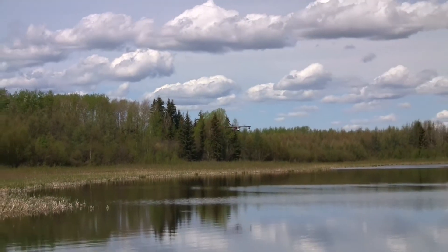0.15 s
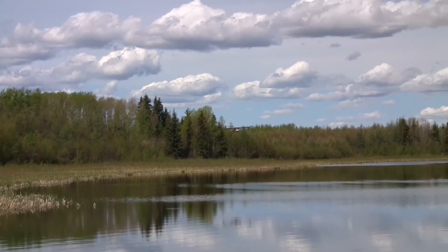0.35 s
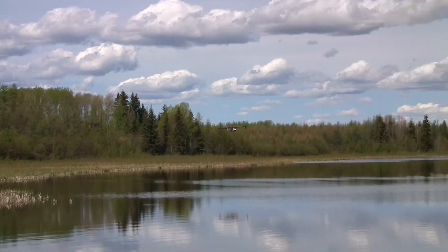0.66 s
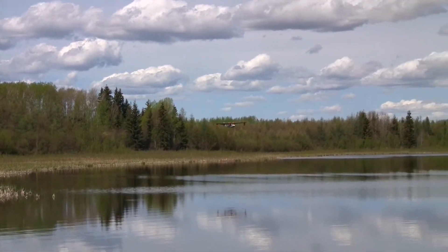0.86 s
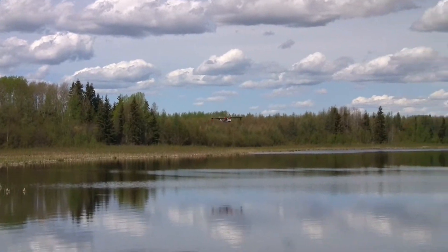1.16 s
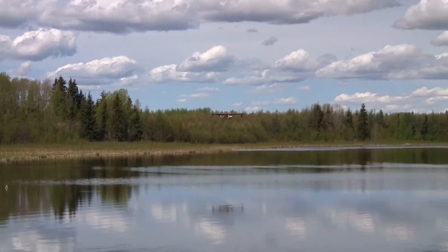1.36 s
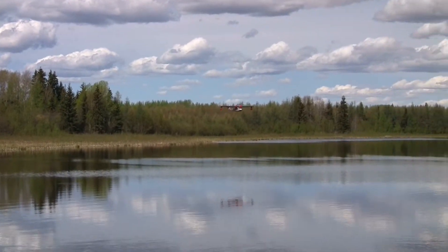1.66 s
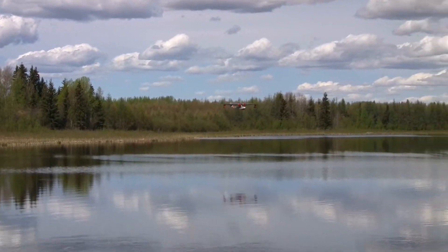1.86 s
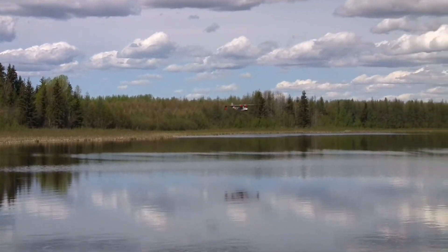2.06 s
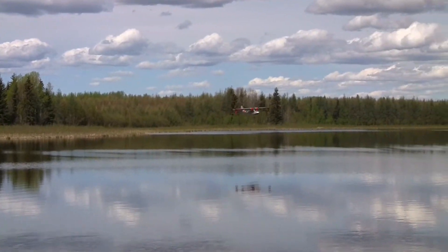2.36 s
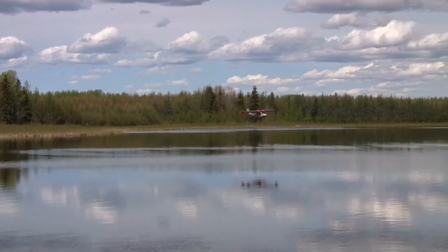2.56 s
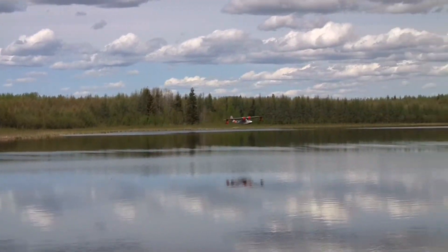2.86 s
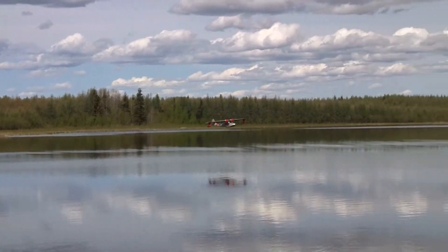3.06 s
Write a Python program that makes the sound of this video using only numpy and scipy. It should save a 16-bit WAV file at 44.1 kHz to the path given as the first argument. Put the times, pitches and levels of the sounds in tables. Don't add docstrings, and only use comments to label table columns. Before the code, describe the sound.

Twin-engined model floatplane drones and crackles as it flies low over a calm lake, nearing

```python
import sys
import numpy as np
from scipy import signal
from scipy.fft import rfft, irfft, next_fast_len
from scipy.io import wavfile
from scipy.ndimage import uniform_filter1d, map_coordinates

SR = 44100
rng = np.random.default_rng(int(sys.argv[2]) if len(sys.argv) > 2 else 0)


def ratio_of_db(decibels):
    return 10 ** (np.asarray(decibels, float) / 20)


def wav_record(signal):
    frames = np.transpose(np.atleast_2d(signal))
    bounded = np.clip(frames, -1, 1)
    quanta = np.round(bounded * 32767).astype(np.int16)
    wavfile.write(sys.argv[1], SR, quanta)


N = 141561
PUFF_TURNS = 0.15


def level(x, db):
    return x * ratio_of_db(db) / np.sqrt(np.mean(x ** 2))


def colour(x, points, sections=()):
    size = next_fast_len(N + SR)
    hz = np.arange(size // 2 + 1) * SR / size
    point_hz, point_db = np.array(points, float).T
    curve_db = np.interp(np.log(hz + 1), np.log(point_hz), point_db)
    cepstrum = irfft(curve_db * np.log(10) / 20, size)
    cepstrum[1:size // 2] *= 2
    cepstrum[size // 2 + 1:] = 0
    gain = np.exp(rfft(cepstrum))
    for zero_hz, zero_width_hz, pole_hz, pole_width_hz in sections:
        zero = zero_hz ** 2 - hz ** 2 + 1j * hz * zero_width_hz
        pole = pole_hz ** 2 - hz ** 2 + 1j * hz * pole_width_hz
        gain = gain * zero / pole
    return irfft(rfft(x, size) * gain, size)[..., :N]


def walk(rate_hz):
    hold = int(SR / rate_hz)
    steps = np.repeat(rng.standard_normal(N // hold + 1), hold)
    return 1.3 * uniform_filter1d(uniform_filter1d(steps, hold), hold)[:N]


def clicks(at, size):
    taps = np.floor(at)[:, None] + np.arange(-7, 9)
    off = taps - at[:, None]
    pulse = size[:, None] * np.sinc(off) * np.cos(off * np.pi / 16) ** 2
    out = np.zeros(N + 32)
    np.add.at(out, np.clip(taps, 0, N).astype(int), pulse)
    return out[:N]


# frequency in Hz, level in dB.
AIR_CURVE = [(25, -28), (50, -22.5), (100, -12), (250, -11), (1500, -14.5), (4000, -16.5), (8000, -40),
             (12500, -44.5)]


def air():
    mid, side = colour(rng.standard_normal((2, N)), AIR_CURVE) * ratio_of_db(walk(0.82))
    side = colour(side, [(30, -1), (300, 0), (3000, 0)])
    return level(np.array([mid + side, mid - side]), -49)


# time in seconds, speed in turns per second.
FAST_ENGINE_SPEED = [(0, 92.3), (.2, 92.6), (.42, 95.6), (.7, 93.7), (.9, 90.7), (1.15, 91), (1.3, 89.2),
                     (1.6, 88.8), (1.8, 87.3), (2.1, 88), (2.35, 86), (2.6, 87), (2.92, 84.4), (3.21, 85.7)]
SLOW_ENGINE_SPEED = [(0, 92), (.2, 92), (.45, 89.3), (.8, 88), (1.1, 87), (1.37, 83.3), (1.52, 85),
                     (1.85, 80), (2.2, 83.2), (2.42, 81.3), (2.63, 83.2), (2.8, 81.8), (3.21, 79.5)]


def engine(speed, gain):
    sway_hz, sway_db, drift_rad = 12, 2.2, 0.45
    turn_jitter, crack_idle_db, crack_scatter_db = 0.005, -5.5, 1.3
    t = np.arange(N) / SR
    phase = np.cumsum(np.interp(t, *np.array(speed).T)) / SR

    hum = 0
    for order in range(1, 29):
        loose = 0.35 if order == 10 else 1
        order_db = -3 * (order % 2) + 5 * (order == 10) - 2.5 * (order == 12)
        sway = ratio_of_db(order_db + loose * sway_db * walk(sway_hz))
        drift = 2 * np.pi * rng.random() + loose * drift_rad * walk(sway_hz)
        hum = hum + sway * np.cos(np.pi * order * phase + drift)

    timing, strength = rng.standard_normal((2, 400))
    turn = np.arange(1, int(phase[-1]))
    when = turn + turn_jitter * timing[turn]
    size = ratio_of_db(crack_idle_db * (turn % 2) + crack_scatter_db * strength[turn])
    crack = clicks(np.interp(when, phase, np.arange(N)), size)
    latest = np.clip(np.searchsorted(when, phase) - 1, 0, len(turn) - 1)
    puff = size[latest] * np.exp(-np.abs(phase - when[latest]) / PUFF_TURNS)
    gas = puff * rng.standard_normal(N)
    return np.array([gain * hum, crack, gas])


# frequency in Hz, level in dB.
WASH_CURVE = [(70, -54.5), (150, -8), (350, -3), (700, -10), (2000, -14), (4000, -22), (8500, -33.5),
              (12500, -56)]
# zero in Hz, zero width in Hz, pole in Hz, pole width in Hz.
SILENCER_SECTIONS = [(580.7, 27, 494.6, 116), (1560, 132, 1599, 393), (3018, 510, 3182, 323),
                     (1000, 388, 1089, 363), (2517, 850, 2470, 460)]


def propeller_wash():
    wash = ratio_of_db(1.52 * walk(9.07)) * rng.standard_normal(N)
    return level(colour(wash, WASH_CURVE, SILENCER_SECTIONS[1:]), -10)


# frequency in Hz, level in dB.
THUMP_CURVE = [(50, -64), (90, -31.5), (260, -6.5), (450, -4.5), (520, -2.5), (590, 1.5), (800, -3.5),
               (1200, -23.5)]
CRACK_CURVE = [(400, -41), (700, 18.5), (1300, 1), (2100, 3), (3300, -7), (5000, -19), (8000, -31.5),
               (11000, -62.5)]
GAS_CURVE = [(500, -24), (1300, -1), (2100, -0.5), (3300, -8), (5000, -14), (8500, -19.5), (10500, -24.5),
             (12500, -55.5)]


def plane(bright, share_db, hum_db, ring_db, db):
    crack_db, gas_db, hard_puff_db, hard_space_s = -11, -18, -7, 0.011
    cowling_hz, cowling_width_hz, clear_hz = 2635, 38, 3780
    fast = engine(FAST_ENGINE_SPEED, ratio_of_db(-share_db / 2))
    slow = engine(SLOW_ENGINE_SPEED, ratio_of_db(share_db / 2))
    thump, crack, gas = fast + slow

    hard = hard_firings(db)
    near_hard = uniform_filter1d(1.0 * (hard != 0), int(hard_space_s * SR)) > 0
    puff_decay = np.exp(-90 / PUFF_TURNS / SR)
    puff = signal.lfilter([1], [1, -puff_decay], hard) * rng.standard_normal(N)
    crack = crack * ~near_hard + hard + backfires()
    gas = gas + ratio_of_db(hard_puff_db) * puff

    high = level(colour(crack, CRACK_CURVE, SILENCER_SECTIONS), crack_db)
    high = high + level(colour(gas, GAS_CURVE, SILENCER_SECTIONS), gas_db)
    ring = signal.lfilter(*signal.iirpeak(cowling_hz, cowling_hz / cowling_width_hz, fs=SR), high)
    hum = ratio_of_db(hum_db) * level(colour(thump, THUMP_CURVE, SILENCER_SECTIONS), 0)
    whole = hum + high + ratio_of_db(ring_db) * ring + propeller_wash()
    treble = whole - signal.filtfilt(*signal.butter(2, clear_hz, fs=SR), whole)
    return whole + (ratio_of_db(1.86 * bright) - 1) * treble


# frequency in Hz, level in dB.
WATER_CURVE = [(2000, 0), (3300, -1), (5000, -2), (9000, -9.5)]


def water_mirror(direct, notch_hz):
    ripple = 0.038
    lag = SR / (2 * notch_hz) * (1 + ripple * walk(11.73))
    mirror = map_coordinates(colour(direct, WATER_CURVE), [np.arange(N) - lag], mode="mirror")
    return ratio_of_db(-2.5) * mirror


# frequency in Hz, level in dB.
TREES_SIDE_CURVE = [(60, -12.5), (300, -2.5), (900, -3.5), (2500, 0.5), (6000, 3.5)]


def tree_line(direct):
    t60_s, lag_s = 0.93, 0.03
    t = np.arange(SR) / SR
    tail = rng.standard_normal((2, SR)) * ratio_of_db(-60 * (t - lag_s) / t60_s) * (t > lag_s)
    tail = tail / np.sqrt((tail ** 2).sum(1, keepdims=True))
    mid, side = signal.fftconvolve(direct[None], tail, axes=1)[:, :N]
    trees = mid + colour(side, TREES_SIDE_CURVE) * np.array([[1], [-1]])
    return ratio_of_db(-13) * trees


# onset in seconds, peak in dB.
HARD_FIRING_EVENTS = [(0.0667, -27), (0.2184, -27), (0.6125, -29), (0.7731, -29), (0.8445, -29),
                      (0.8784, -28), (0.9128, -28), (0.9363, -29), (0.9587, -24), (1.1543, -27),
                      (1.2999, -27), (1.3663, -24), (1.4127, -27), (1.4351, -26), (1.4616, -22),
                      (1.5324, -24), (1.5698, -25), (1.6377, -24), (1.6601, -25), (1.6831, -25),
                      (1.699, -23), (1.7514, -26), (1.7594, -23), (1.8467, -21), (1.8716, -23),
                      (1.8966, -26), (1.922, -25), (1.9714, -24), (1.9959, -21), (2.0208, -25),
                      (2.0597, -24), (2.1051, -24), (2.1276, -22), (2.1505, -25), (2.1735, -23),
                      (2.2139, -24), (2.2308, -23), (2.2867, -24), (2.3106, -25), (2.3715, -22),
                      (2.3935, -26), (2.4054, -22), (2.4334, -24), (2.4828, -23), (2.5082, -23),
                      (2.5311, -23), (2.579, -25), (2.601, -26), (2.6155, -24), (2.6469, -23),
                      (2.7487, -22), (2.7731, -24), (2.798, -24), (2.822, -24), (2.8804, -23),
                      (2.9277, -24), (2.9711, -26), (3.0195, -25), (3.046, -24), (3.1328, -25)]


def hard_firings(db):
    hard_db, lag_s, spread = 3.5, 0.001, 0.7
    at_s, peak_db = np.array(HARD_FIRING_EVENTS).T
    at = (at_s + lag_s) * SR
    peak_db = peak_db - db[at.astype(int)]
    return clicks(at, ratio_of_db(spread * (peak_db - peak_db.mean()) + hard_db))


# start in seconds, level in dB.
BACKFIRE_EVENTS = [
    (1.0395, 6),
    (1.8472, -1),
    (1.9724, -2),
    (2.1061, 0),
    (2.4833, -2),
    (2.9462, -3),
    (3.1323, -2),
]
# frequency in Hz, level in dB.
BACKFIRE_CURVE = [(1800, -10), (3200, 0), (6000, 9)]


def backfires():
    at_s, hit_db = np.array(BACKFIRE_EVENTS).T
    return colour(clicks(at_s * SR, ratio_of_db(hit_db + 9)), BACKFIRE_CURVE)


# time in seconds, level in dB, treble clarity, first water notch in Hz,
# slow engine against fast in dB, exhaust hum in dB, cowling ring in dB.
FLIGHT_PATH = [(0, -31, -8, 673, -7, -2.5, 10), (.15, -29.5, -4, 690, -1, -7.5, 11),
               (.3, -30.5, -3.5, 717, 1, -3.5, 11), (0.552, -31, -5.5, 816, 4, -0.5, -14),
               (0.801, -31.5, -4, 894, 3.5, -0.5, -20), (1.05, -32, -1, 980, 6, 0, -20),
               (1.3, -29, -4.5, 955, 6.5, -2.5, -17), (1.6, -28, -2.5, 960, 4.5, -2.5, -20),
               (1.85, -29.5, 0.1, 950, -1, -1, -19), (2.2, -28.5, -0.9, 957, -1, -1, -26),
               (2.401, -27.5, -0.4, 948, 3.5, -1, -18), (2.6, -28.5, -0.3, 1000, -1.5, 0.5, -21),
               (2.9, -29, 0.6, 1190, 1.5, 1, -32), (3.21, -29, 0.9, 1454, -7, 1, -24)]


def scene():
    t = np.arange(N) / SR
    when, *columns = np.array(FLIGHT_PATH).T
    db, bright, notch_hz, share_db, hum_db, ring_db = (np.interp(t, when, c) for c in columns)
    direct = plane(bright, share_db, hum_db, ring_db, db) * ratio_of_db(db)
    return direct + water_mirror(direct, notch_hz) + tree_line(direct) + air()


def low_pass(x):
    return signal.sosfilt(signal.butter(12, 12920, fs=SR, output="sos"), x)


# frequency in Hz, level in dB.
TOP_CURVE = [(9000, 0.5), (11000, -3.5), (12000, -1), (12600, 1), (13700, -18)]
# zero in Hz, zero width in Hz, pole in Hz, pole width in Hz
LEFT_PORT_SECTIONS = [(2704, 590, 2536, 520), (5260, 830, 5840, 530), (10450, 1700, 11170, 2100),
                      (169, 318, 175, 320)]
RIGHT_PORT_SECTIONS = [(1000, 621, 1011, 617), (5600, -500, 6560, 3530), (3870, 1183, 4280, 1240)]


def record(dry):
    left = colour(dry[0], TOP_CURVE, LEFT_PORT_SECTIONS) * ratio_of_db(1.5)
    right = colour(dry[1], TOP_CURVE, RIGHT_PORT_SECTIONS) * ratio_of_db(3)
    return low_pass(np.array([left, right]))


dry = scene()
out = record(dry)
wav_record(out)
```